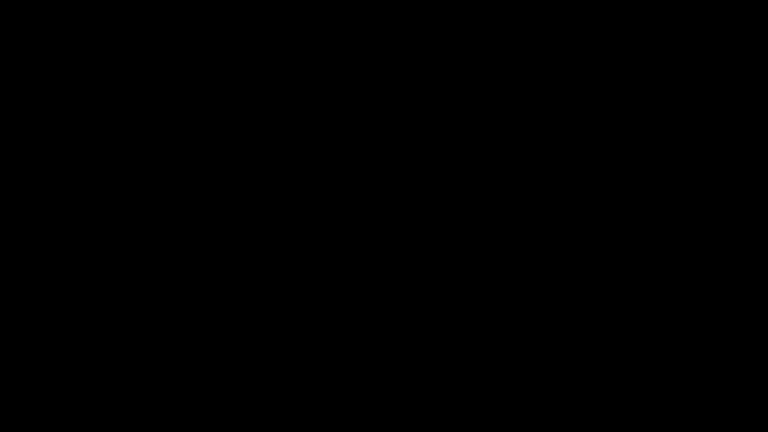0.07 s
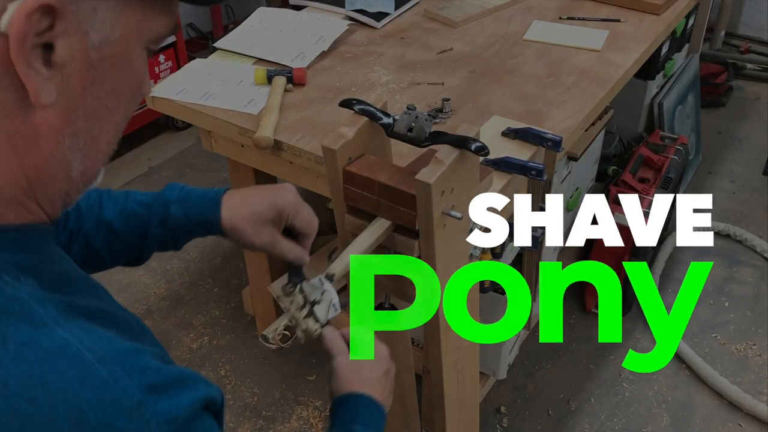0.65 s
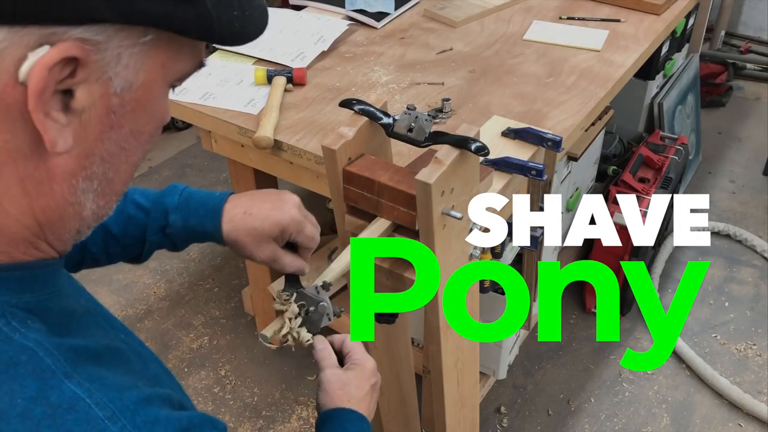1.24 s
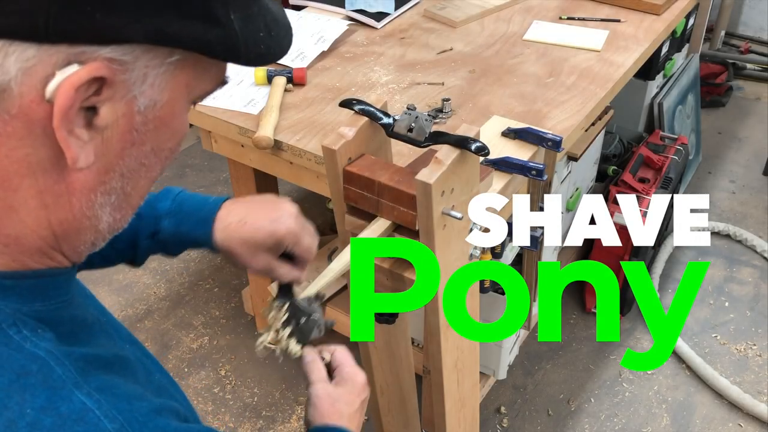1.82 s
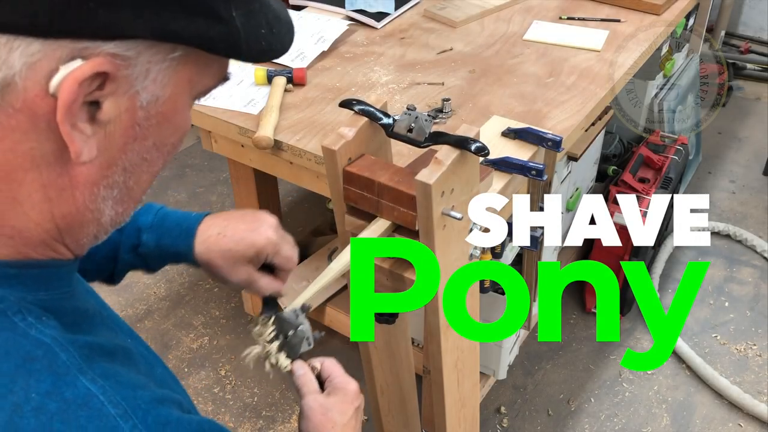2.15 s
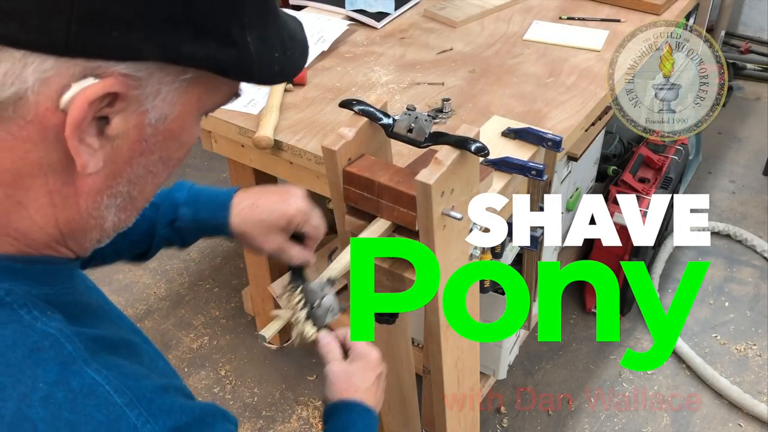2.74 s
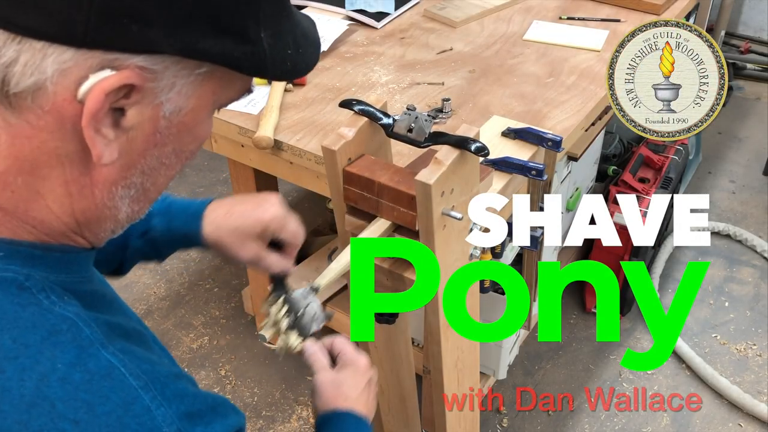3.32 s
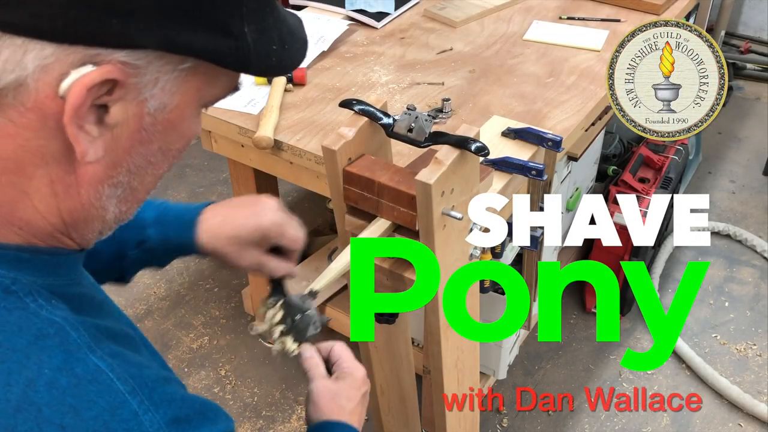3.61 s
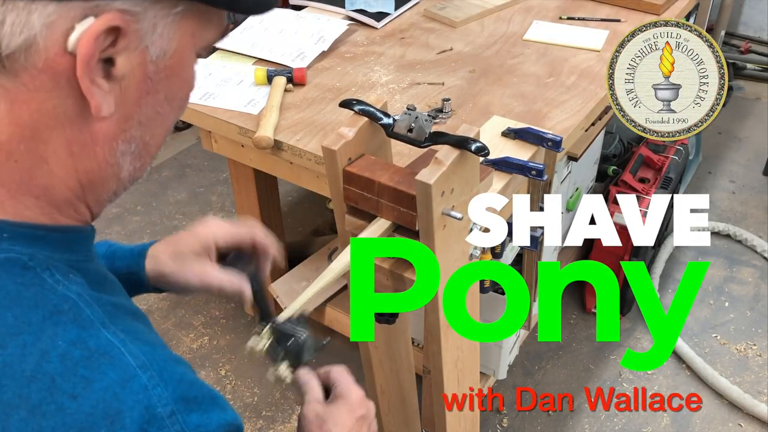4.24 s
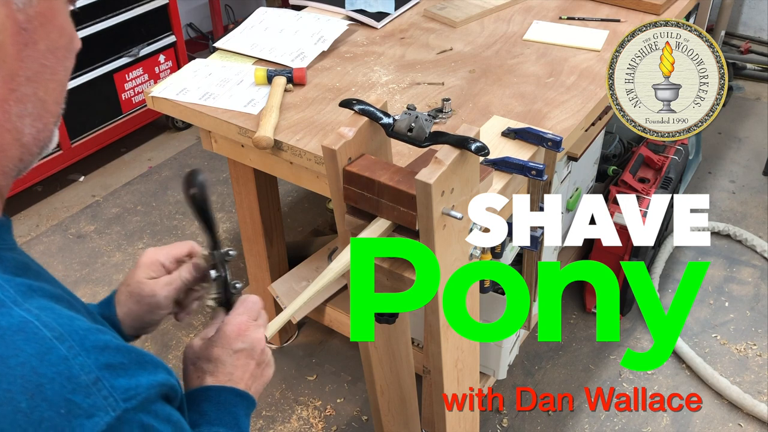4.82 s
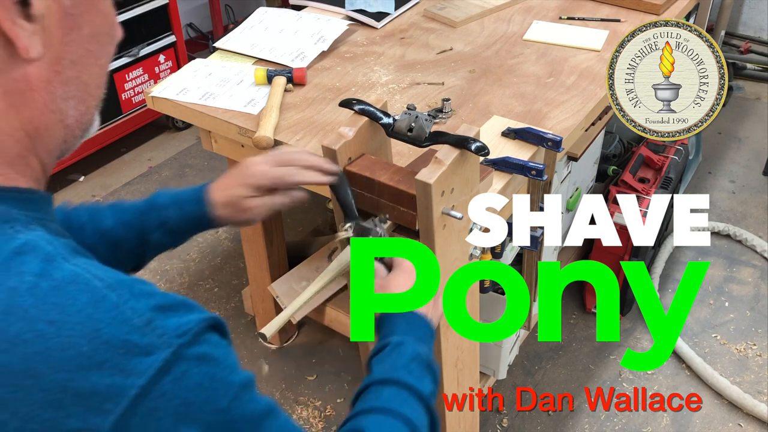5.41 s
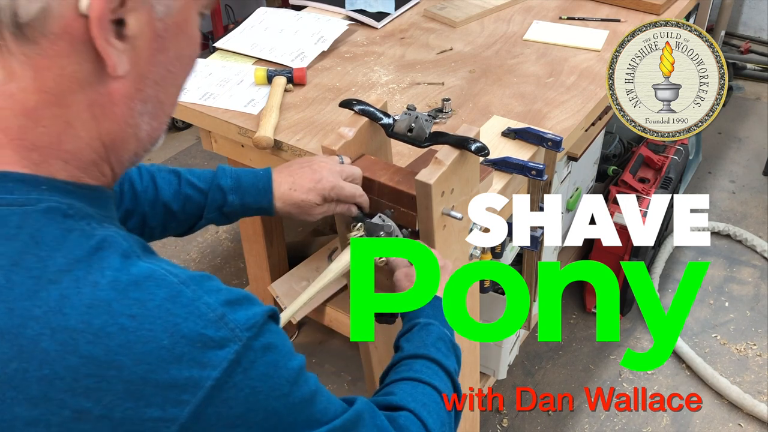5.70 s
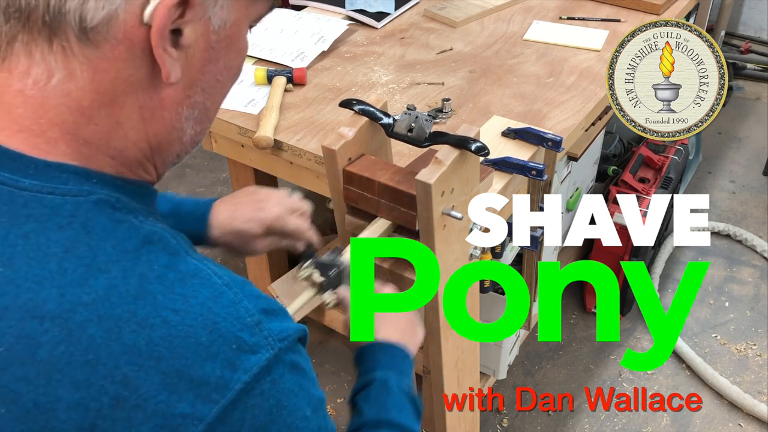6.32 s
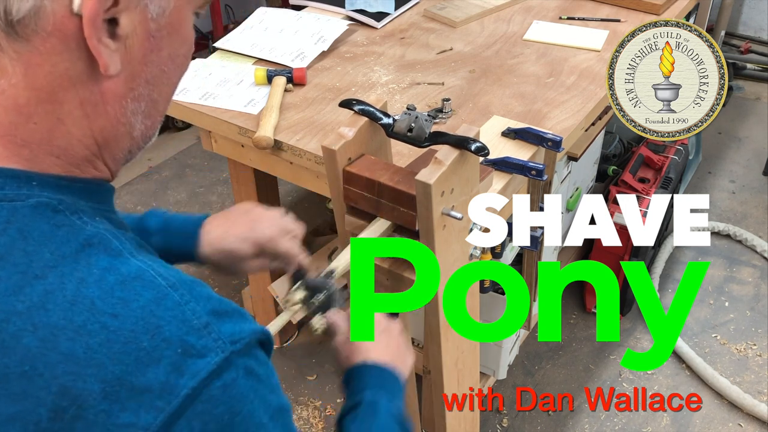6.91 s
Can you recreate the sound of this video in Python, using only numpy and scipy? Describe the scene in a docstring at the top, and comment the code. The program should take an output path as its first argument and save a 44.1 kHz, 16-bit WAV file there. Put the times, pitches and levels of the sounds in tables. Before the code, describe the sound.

In a workshop with a short echo and a faint ventilation rumble, a hand blade shaves a wooden stick close by. Several short scrapes come at a steady pace, with small knocks as the tool lands and ticks as shavings break off. The cutting stops for a moment of light clicks and papery crackling, then resumes with two longer, hissing strokes that rise in pitch.

```python
"""A spokeshave knocks and skids onto a stick clamped in a vice, then makes five short cuts: tearing
fibres drive stick, iron body and blade, ripples in the wood hum at a pitch that follows the hand's
speed, and shavings snap off. In a pause, fingers tap the tool and pluck crackling curls from it.
It is set down again for two long strokes. Throughout, the workshop answers with a flutter echo
and a short reverberation, over a low ventilation rumble."""
import sys
import numpy as np
from scipy import signal
from scipy.fft import rfft, irfft
from scipy.io import wavfile
from scipy.ndimage import uniform_filter1d

SR = 44100
rng = np.random.default_rng(int(sys.argv[2]) if len(sys.argv) > 2 else 0)


def waveform_to_disk(signal):
    """Save audio, clipped to [-1, 1], as 16-bit WAV at the path in sys.argv[1]."""
    frames = np.transpose(np.atleast_2d(signal))
    scaled = np.clip(frames, -1, 1) * 32767
    samples = np.round(scaled).astype(np.int16)
    wavfile.write(sys.argv[1], SR, samples)


N = 306936
TIME = np.arange(N) / SR
TICKS = TIME[::64]  # coarse clock for the gesture envelopes
FREQ = np.maximum(np.arange(2049) * SR / 4096, 1)

# The stick's woody groan: pitch_hz, width_hz, level_db
STICK_MODES = [(144, 12.4, -2.5), (206, 36, -11), (256, 72, -4.5), (382.5, 82, 0), (486, 22, 0.5),
               (568, 54, 0.5), (647, 135, -0.5), (795, 115, -0.5), (904, 48, -4), (983, 13.2, 2)]
# The iron body's rasp: pitch_hz, width_hz, level_db
BODY_MODES = [(1133, 390, -3.5), (1293, 72, 1.5), (1454, 79, 3.5), (1555, 31, 0.5), (1709, 124, 2.5),
              (2186, 380, -5), (2740, 110, -12), (3236, 790, -10.5), (3760, 720, -11)]
# The blade's hiss: pitch_hz, width_hz, level_db
BLADE_MODES = [(5186, 780, 4), (6210, 900, 5), (7000, 770, -3), (8450, 2400, -1), (8930, 310, 7),
               (10270, 680, -0.5), (11400, 1700, -2), (13660, 2500, -4)]
# Passes of the blade, heavy and light:
# start_s, peak_s, rise_s, fall_s, groan_db, rasp_db, hiss_db, sizzle_db, hum_top_hz, hum_db
BLADE_PASSES = [(0.684, 0.818, .15, .15, -56.5, -60.5, -64, -70, 161, -66.5),
                (.86, 0.986, .13, 0.058, -46.5, -55, -63.5, -72, 189.7, -51),
                (1.24, 1.398, 0.19, .14, -39.5, -45, -43.5, -59, 283, -46),
                (1.609, 1.647, 0.13, 0.081, -47.5, -53, -63, -62, 244, -51.5),
                (1.98, 2.16, .19, 0.13, -35.5, -40, -40.5, -51, 258.3, -39.5),
                (2.64, 2.828, .20, .105, -31.5, -37.5, -38, -43, 390, -39),
                (3.223, 3.315, 0.1416, .10, -45.5, -49.5, -53, -54, 252.5, -65.5),
                (3.353, 3.402, 0.064, 0.076, -33.5, -39.5, -39.5, -50, 259.4, -39.5),
                (3.809, 3.932, .16, .08, -34, -39, -41, -45, 391.4, -44),
                (5.655, 5.745, 0.19, .11, -51.5, -58, -68, -78, 140.2, -46.5),
                (5.854, 5.965, 0.089, .10, -41, -51.5, -46, -55, 164.8, -43.5),
                (5.939, 6.128, .24, .15, -33.5, -36, -34.5, -48, 586.2, -33.5),
                (6.168, 6.235, 0.0793, 0.082, -47, -70, -64, -69, 287.6, -40.5),
                (6.35, 6.45, 0.22, 0.12, -40, -44.5, -50.5, -66, 200.3, -59),
                (6.58, 6.699, 0.14, 0.17, -33.5, -41.5, -38.5, -50, 279.4, -39.5),
                (6.699, 6.90, 0.36, .24, -35.5, -35, -34.5, -40, 557.5, -29)]
def cutting():
    """Fibres tear in a dense, uneven stream that shakes stick, iron body and blade together."""
    *_, groan_db, rasp_db, hiss_db, sizzle_db, _, _ = np.transpose(BLADE_PASSES)
    *_, skid_groan_db = np.transpose(SOLE_SKIDS)
    bite = undb(1.7 * walk(260) + .8 * walk(45))
    tearing = bite * (grains(rate_hz=5000, spread_db=3) + undb(-2) * rng.standard_normal(N))
    # now and then a thicker bundle gives way with a crackle of its own
    crackling = tearing + undb(-7) * grains(rate_hz=240, spread_db=-1.5)
    # the stick is loaded after the blade and lets go more slowly; skids make it groan too
    groan = combined(efforts(lag_s=.022, fall_stretch=1.29), groan_db)
    groan = np.hypot(groan, combined(slides(), skid_groan_db))
    rasp = combined(efforts(lag_s=.0067, fall_stretch=1.17), rasp_db)
    hiss = combined(efforts(), hiss_db)
    sizzle = combined(efforts(lag_s=-.0025), sizzle_db)  # the very edge peaks and dies first
    stick = colour(tearing, resonances(STICK_MODES, skirt=1.48)) * groan
    body = colour(crackling, resonances(BODY_MODES, skirt=1.45)) * rasp
    blade = colour(crackling, resonances(BLADE_MODES, skirt=2.03)) * hiss
    edge = colour(crackling, resonances([(14500, 6370, 0)], skirt=1.12)) * sizzle
    return stick + body + blade + edge


def ripple_hum():
    """Uneven ridges bump the sole: a rough hum that rises with speed, coloured by the stick."""
    *_, top_hz, hum_db = np.transpose(BLADE_PASSES)
    speed = efforts(lag_s=.0217, fall_stretch=1.1)
    slow_hz = np.minimum(.85 * top_hz, 234.6)  # even the fastest pass starts and ends low
    pitches = slow_hz[:, None] + (top_hz - slow_hz)[:, None] * speed ** 1.3
    loudest_pass = np.argmax(speed * undb(hum_db)[:, None], axis=0)
    hz = np.interp(TIME, TICKS, pitches[loudest_pass, np.arange(len(TICKS))])
    phase = 2 * np.pi * np.cumsum(hz * (1 + .0827 * walk(220))) / SR
    bumps = np.sin(phase) + undb(-15.5) * np.sin(2 * phase)
    hum = colour(bumps, resonances(STICK_MODES, skirt=.95))
    levelled = hum / np.sqrt(uniform_filter1d(hum ** 2, size=SR // 25) + 1e-9)
    return levelled * combined(speed, hum_db) * undb(1.05 * walk(110))


# Crisp snaps of shavings: start_s, level_db, centre_hz, relative_ring_db
SHAVING_SNAPS = [(.968, -20, 10200, -26), (1.179, -22, 8800, -38), (1.183, -24.5, 9030, -23),
                 (1.2463, -25.5, 9950, -25), (1.495, -31.5, 2980, 0), (1.627, -14, 10100, -25),
                 (1.649, -26, 9500, -18), (1.932, -26, 9280, -30), (1.941, -19.5, 9640, -38),
                 (2.228, -17, 4680, -20), (2.57, -34, 10000, -28), (3.207, -24.5, 11130, -27),
                 (3.234, -27, 10160, -15), (3.3165, -24, 11040, -25), (3.381, -8, 11190, -34),
                 (3.4058, -9.5, 8650, -10), (3.7499, -21, 9770, -33), (3.8203, -25.5, 10000, -22),
                 (4.317, -36, 8800, -18), (4.518, -38, 11000, -25), (4.826, -25, 6840, -31),
                 (5.654, -21.5, 5870, -3), (5.721, -14, 10380, 14.5), (5.839, -38, 8360, -12),
                 (5.964, -18, 10920, 18), (6.3941, -11.5, 11300, -11), (6.5122, -18.5, 10900, -17),
                 (6.5928, -29, 10100, -22.5)]
def snaps():
    """A shaving breaks off, flicks the blade's heavily damped modes and jolts the iron body."""
    out, jolts, t = np.zeros(N), np.zeros(N), TIME[:SR // 20]
    for start_s, db, hz, ring_db in SHAVING_SNAPS:
        modes = sum(np.sin(2 * np.pi * hz * ratio * t) for ratio in (.94, 1, 1.07)) / 2
        ring = undb(ring_db) * np.exp(-t / .0006) * modes
        click = np.exp(-t / .00012) * np.cos(2 * np.pi * hz * t)
        splinters = undb(-5) * crack(hz, width=.65, decay_s=.0008, tail_db=-13, tail_s=.0025)
        add(out, start_s, click + splinters + ring, db)
        jolts[int(start_s * SR)] = undb(db)
    # the shaving scrapes over the body for a few milliseconds
    scrape = np.convolve(jolts, crack(4400, width=1, decay_s=.0031, tail_db=-2, tail_s=.0087))[:N]
    body = colour(scrape, resonances(BODY_MODES[4:], skirt=1)) * np.sqrt(np.mean(jolts ** 2))
    return signal.sosfilt(signal.butter(2, 13500, fs=SR, output="sos"), out) + undb(-6.5) * body


# The ring of one knock: pitch_ratio, level_db, t60_s
KNOCK_RING = [(.6, -19, 0.08), (.74, 11, 0.18), (.9, -19, 0.022), (1, 37, 0.064), (1.12, -22, 0.015),
              (1.45, -29, 0.021), (2.22, -11, 0.032), (2.8, 15, 0.02), (4.7, -57, 0.013), (7.1, -15, 0.059)]
# The tool set down on the wood: start_s, level_db, pitch_hz
SOLE_KNOCKS = [(.517, -67, 750), (.877, -43.5, 874), (1.179, -31, 787), (1.931, -25.5, 814),
               (1.938, -29.5, 784), (2.577, -30, 885), (3.204, -39, 834), (3.741, -28.5, 822),
               (3.797, -34.5, 850), (5.633, -33.5, 890), (5.643, -33.5, 883)]
def knocks():
    """The sole lands on the clamped stick with a short rattle, and the stick rings briefly."""
    out, t = np.zeros(N), TIME[:SR // 5]
    rattle_band = signal.butter(2, (450, 2400), "band", fs=SR, output="sos")
    attack = 1 - np.exp(-t / .0004)
    for start_s, db, hz in SOLE_KNOCKS:
        ring = sum(undb(mode_db - 60 * t / t60_s) * np.sin(2 * np.pi * hz * ratio * t)
                   for ratio, mode_db, t60_s in KNOCK_RING)
        rattle = signal.sosfilt(rattle_band, rng.standard_normal(len(t)))
        rattle = rattle / np.abs(rattle).max() * np.exp(-t / .014)
        add(out, start_s, (ring / np.abs(ring).max() + rattle) * attack, db)
    return out


# The iron sole's scrape: pitch_hz, width_hz, level_db
SOLE_MODES = [(644, 150, -12.5), (840, 64, 4), (1760, 240, -8.5), (2264, 250, -6), (3820, 440, -11.5),
              (5700, 480, -18.5), (8500, 2200, -21.5)]
# The sole landing and sliding: start_s, length_s, landing_db, sliding_db, groan_db
SOLE_SKIDS = [(0.514, 0.49, -72, -71, -64.5), (0.883, 0.3, -62, -66.5, -52.5),
              (1.171, 0.062, -54, -56, -45), (1.615, .16, -36.5, -68, -51.5),
              (1.927, 0.063, -29.5, -66, -47), (2.57, 0.06, -36.5, -57.5, -43.5),
              (3.194, 0.088, -41, -43.5, -49.5), (3.497, .22, -70, -68, -52),
              (3.746, 0.096, -54.5, -57, -50.5), (5.521, 0.081, -64, -56, -61),
              (5.628, 0.048, -54, -60, -40.5), (6.305, 0.36, -70, -61, -45.5)]
def skidding(landing_decay_s=.0094):
    """The sole lands with a scuff, then sticks and slips on the bare wood; the iron rings with it."""
    starts, _, landing_db, sliding_db, _ = np.transpose(SOLE_SKIDS)
    contact = slides()
    landings = contact * np.exp(-np.clip((TICKS - starts[:, None]) / landing_decay_s, 0, 20))
    level = combined(landings, landing_db) + combined(contact, sliding_db)
    slips = grains(rate_hz=2500, spread_db=1.2)
    return colour(slips, resonances(SOLE_MODES, skirt=1.39)) * level


# The papery tone of dry curls: frequency_hz, level_db
CURL_SPECTRUM = [(600, -16.5), (1500, -11), (2800, -6), (4500, -4.5), (8000, -4), (11000, -5), (15500, -6)]
# Shavings tugged or brushed in the tool's mouth: start_s, peak_s, rise_s, fall_s, level_db
CURL_TUGS = [(2.534, 2.572, 0.022, 0.022, -48), (3.177, 3.206, 0.035, 0.037, -54),
             (3.603, 3.69, .15, 0.18, -62.5), (4.304, 4.326, .05, 0.095, -57.5),
             (4.505, 4.66, 0.28, 0.44, -52), (4.74, 4.778, 0.059, 0.054, -44.5),
             (4.812, 4.834, 0.028, 0.055, -37.5), (4.98, 5.036, 0.028, .035, -45.5),
             (6.30, 6.40, 0.14, 0.046, -50)]
def plucking():
    """Dry curls crackle against each other at every tug."""
    crackle = grains(rate_hz=2600, spread_db=3.5)
    tugs = [swell(*timing) for *timing, _ in CURL_TUGS]
    pull = combined(tugs, [db for *_, db in CURL_TUGS])
    return colour(crackle, spectrum(CURL_SPECTRUM)) * pull


# Light clicks of handling and of the tool touching down: start_s, level_db, pitch_hz
HANDLING_TAPS = [(0.516, -53.5, 1570), (0.88, -36, 1560), (4.312, -41, 1530), (4.317, -34.5, 1760),
                 (4.704, -43, 1687), (5.516, -34.5, 1790), (5.532, -32.5, 2297), (6.363, -27, 1180)]
def taps():
    """Dull little clicks as the tool is turned in the hands; the first ones sharpen its landing on the wood."""
    out = np.zeros(N)
    for start_s, db, hz in HANDLING_TAPS:
        add(out, start_s, crack(hz, width=.25, decay_s=.0016, tail_db=-10, tail_s=.008), db)
    return signal.sosfilt(signal.butter(2, 3800, fs=SR, output="sos"), out)


def workshop(x, wet_db, t60_low_s, t60_high_s, flutter_s=1 / 60):
    """Direct sound and a near reflection bounce between floor and ceiling, with a diffuse tail."""
    t, flutter = TIME[:SR], np.zeros(SR)
    flutter[0] = 1
    for bounce in range(1, 9):
        flutter[round(bounce * flutter_s * SR)] = -undb(-5.5 - 3.4 * bounce)
    # the cluttered bench scatters its reflection over a moment, mostly treble
    scatter = np.diff(rng.standard_normal(SR // 700) * np.hanning(SR // 700))
    bench = np.convolve(flutter, scatter / np.linalg.norm(scatter))
    bench = np.pad(bench, (int(.0066 * SR), 0))[:SR]
    noise = rng.standard_normal(SR)
    low = signal.sosfiltfilt(signal.butter(2, 4000, fs=SR, output="sos"), noise)
    tail = low * undb(-60 * t / t60_low_s) + (noise - low) * undb(-60 * t / t60_high_s)
    tail *= 1 - np.exp(-t / .0029)
    response = flutter + undb(-8.5) * bench + undb(wet_db) * tail / np.linalg.norm(tail)
    return signal.fftconvolve(x, response)[:N]


# The room tone's colour: frequency_hz, level_db
AIR_SPECTRUM = [(15, -19), (25, -21), (74, 3.5), (130, -4.5), (161, -5), (326, -5), (531, -12.5),
                (650, -15), (962, -16), (1190, -21), (1560, -18), (1790, -22), (16000, -34)]
# The room tone comes up, then holds: time_s, level_db
AIR_LEVELS = [(.4, -69.5), (.6, -73), (.85, -71), (1.2, -56), (6.96, -57.5)]
def shop_air():
    """Low ventilation rumble under a faint hiss."""
    level_db = np.interp(TIME, *np.transpose(AIR_LEVELS))
    return colour(rng.standard_normal(N), spectrum(AIR_SPECTRUM)) * undb(level_db + .22 * walk(6))


def swell(start_s, peak_s, rise_s, fall_s, onset_s=.0194):
    """Effort of one gesture over TICKS, 0 to 1; rise_s and fall_s each span 20 dB."""
    before = np.maximum(peak_s - TICKS, 0) / rise_s
    after = np.maximum(TICKS - peak_s, 0) / fall_s
    onset = np.clip((TICKS - start_s) / onset_s, 0, 1)
    return onset * undb(-20 * np.minimum(before ** 1.5 + after ** 1.9, 10))


def efforts(lag_s=0, fall_stretch=1):
    """The swell of each pass, as felt by a part that follows the blade with some lag."""
    return np.array([swell(start, peak + lag_s, rise, fall * fall_stretch)
                     for start, peak, rise, fall, *_ in BLADE_PASSES])


def slides(attack_s=.0087, release_s=.03):
    """The envelope of each skid: it starts quickly, holds and is released."""
    return np.array([np.clip((TICKS - start) / attack_s, 0, 1)
                     * np.exp(-np.clip((TICKS - start - length) / release_s, 0, 20))
                     for start, length, *_ in SOLE_SKIDS])


def combined(shapes, db):
    """Overlapping gestures add in power, each at its own level; one gain per sample."""
    return np.interp(TIME, TICKS, np.sqrt(undb(db) ** 2 @ np.square(shapes)))


def crack(hz, width, decay_s, tail_db, tail_s):
    """A short burst and a weaker tail through one broad resonance (width as a share of hz); peak 1."""
    t = TIME[:SR // 20]
    burst = rng.choice([-1, 1], len(t)) * (np.exp(-t / decay_s) + undb(tail_db) * np.exp(-t / tail_s))
    sound = signal.lfilter(*signal.iirpeak(hz, 1 / width, fs=SR), burst)
    return sound / np.abs(sound).max()


def grains(rate_hz, spread_db):
    """Sparse impulses of uneven size; a positive spread makes a few stand out."""
    fires = rng.random(N) < rate_hz / SR
    size = np.minimum(rng.exponential(size=N), 4.5)
    return unit(fires * undb(spread_db * size) * rng.choice([-1, 1], N))


def walk(rate_hz):
    """Smooth random wander of spread 1."""
    steps = rng.standard_normal(N // 8)
    return unit(np.interp(TIME * rate_hz, np.arange(len(steps)), steps))


def resonances(modes, skirt):
    """Gain of overlapping resonances; a larger skirt makes deeper valleys."""
    return np.sqrt(sum(undb(db) ** 2 / (1 + ((FREQ ** 2 - hz ** 2) / (FREQ * width)) ** 2) ** skirt
                       for hz, width, db in modes))


def spectrum(points):
    """Gain through (frequency_hz, level_db) points."""
    hz, db = np.transpose(points)
    return undb(np.interp(np.log(FREQ), np.log(hz), db))


def colour(x, gain):
    """Minimum-phase filter with the given gain at each of FREQ; output rms 1."""
    cepstrum = irfft(np.log(gain + 1e-6))
    half = len(cepstrum) // 2
    cepstrum[1:half] *= 2
    cepstrum[half + 1:] = 0
    response = irfft(np.exp(rfft(cepstrum)))[:half]
    return unit(signal.fftconvolve(x, response)[:N])


def add(track, start_s, sound, peak_db):
    """Mix a short sound into the track."""
    start = int(start_s * SR)
    track[start:start + len(sound)] += (undb(peak_db) * sound / np.abs(sound).max())[:N - start]


def undb(db):
    """Decibels to gain."""
    return 10 ** (np.asarray(db) / 20)


def unit(x):
    """Scale to rms 1."""
    return x / np.sqrt(np.mean(x ** 2))


def scene():
    """All the work sounds in the workshop, over its room tone; mono."""
    work = cutting() + ripple_hum() + skidding() + plucking() + knocks() + snaps() + taps()
    return (workshop(work, wet_db=-7, t60_low_s=.73, t60_high_s=.28) + shop_air())[None]


def record(dry, fade_in_s=(.34, .5), top_hz=16000):
    """The sound fades in from silence; a steep low-pass trims the top of the treble."""
    faded = dry * np.interp(TIME, fade_in_s, (0, 1))
    return signal.sosfilt(signal.ellip(10, .2, 70, top_hz, fs=SR, output="sos"), faded)


dry = scene()
out = record(dry)
waveform_to_disk(out)
```